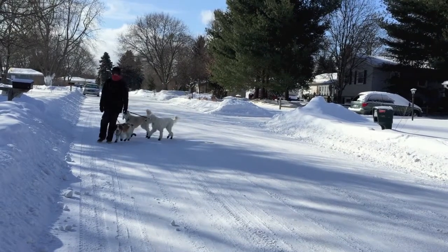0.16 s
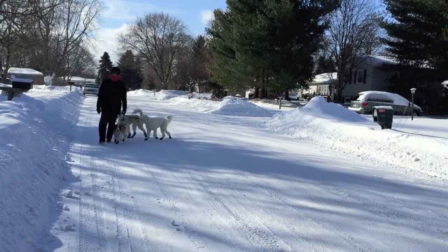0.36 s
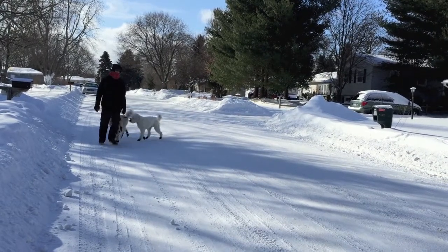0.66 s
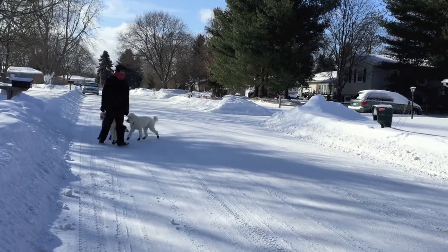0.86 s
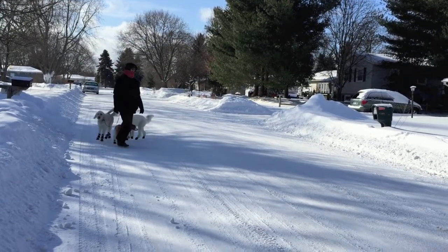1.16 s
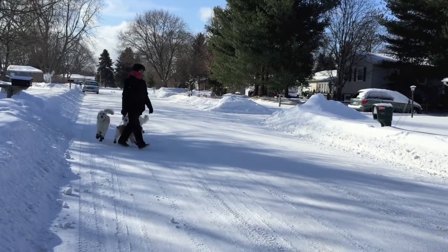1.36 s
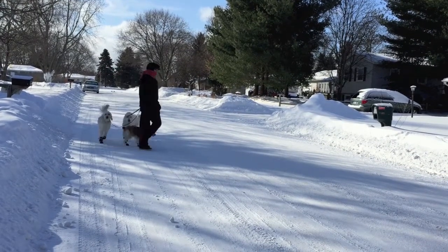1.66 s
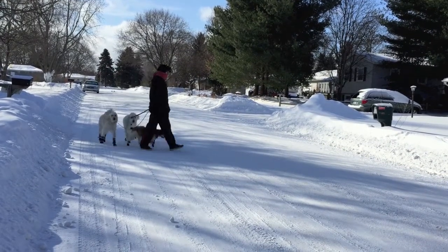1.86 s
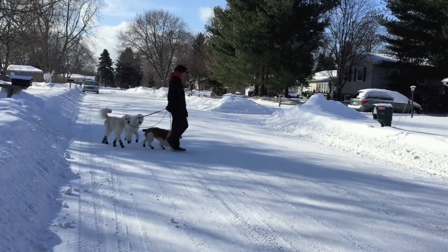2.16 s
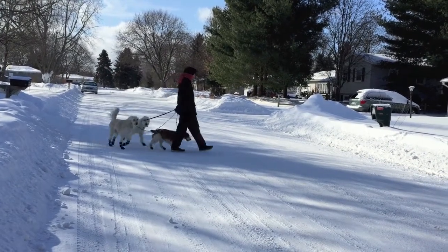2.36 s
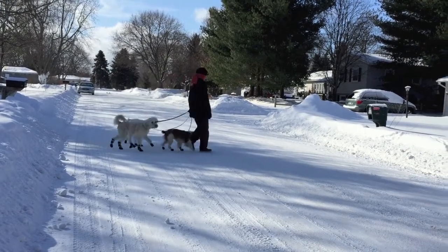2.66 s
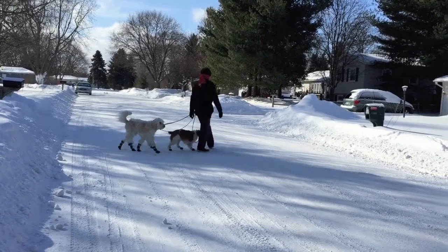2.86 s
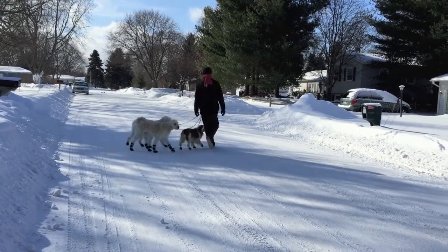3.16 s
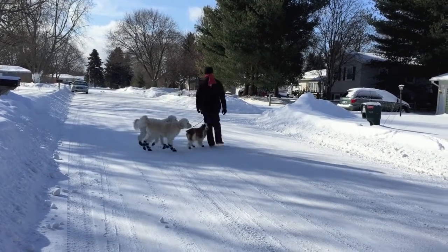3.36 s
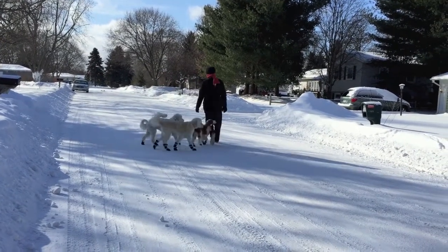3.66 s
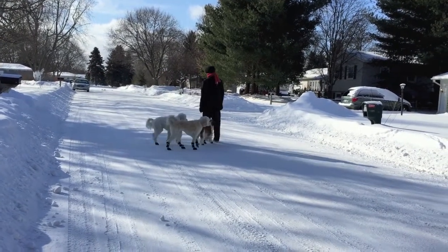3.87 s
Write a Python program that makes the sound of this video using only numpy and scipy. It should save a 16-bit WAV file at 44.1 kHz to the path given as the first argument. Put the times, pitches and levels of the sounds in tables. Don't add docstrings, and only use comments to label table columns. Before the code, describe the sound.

Snow crunches under a walker's boots and dogs' paws, quiet and somewhat distant in the open. Clustered grainy crushes with snaps and dull thuds fall near 0.5, 1.1, 1.6, 2.1, 2.6, 3.1 and 3.7 seconds, paw ticks and scuffs between. Tags clink near 0.1, 0.8, 0.95 and 3.3; faint squeaks come around 0.5, 1.3 and 1.9. A low gust thumps at the start, more from 1.6, strongest again near 3.4.

```python
import sys
import numpy as np
from scipy import signal
from scipy.io import wavfile
from scipy.ndimage import uniform_filter1d

SR = 44100
rng = np.random.default_rng(int(sys.argv[2]) if len(sys.argv) > 2 else 0)


def ratio(d):
    e = np.asarray(d, float) / 20
    return 10 ** e


def master_out(mix):
    frames = np.transpose(np.atleast_2d(mix))
    ceiling = np.clip(frames, -1, 1)
    pcm = np.round(ceiling * 32767).astype(np.int16)
    wavfile.write(sys.argv[1], SR, pcm)


N = 176400


def rms_one(x):
    return x / np.sqrt(np.mean(x ** 2) + 1e-20)


def band(x, low_hz, high_hz):
    edges = [low_hz, min(high_hz, .45 * SR)]
    return signal.sosfilt(signal.butter(2, edges, "band", fs=SR, output="sos"), x)


def drift(rate_hz):
    r = np.exp(-80 * np.pi * rate_hz / SR)
    noise = rng.standard_normal(N // 40 + 2002)
    slow = signal.lfilter([1], [1, -2 * r, r * r], noise)[2000:]
    return np.interp(np.arange(N) / 40, np.arange(len(slow)), rms_one(slow))


def ring(clicks, hz, t60):
    r, w = ratio(-60 / (t60 * SR)), 2 * np.pi * hz / SR
    return signal.lfilter([0, np.sin(w)], [1, -2 * r * np.cos(w), r * r], clicks + 1e-18)


def press(start, length):
    press_share, lift_share = .42, .55
    span = np.arange(int(max(start, 0) * SR), min(int((start + length) * SR), N))
    u = (span / SR - start) / length
    shape = np.clip(np.minimum(u / press_share, (1 - u) / lift_share), 0, 1)
    return span, u, np.sin(np.pi / 2 * shape) ** 2


def hush():
    # (frequency [Hz], density [dB per Hz])
    spectrum = [(88, -31), (150, -7.5), (416, -17.5), (787, -12.5), (1800, -14), (4290, -22), (4910, -24),
                (9270, -26), (15000, -36)]
    level_total_db, patchy_db = -68, .7
    out, together = 0, drift(3)
    edges = 140 * 2 ** np.arange(0, 7.1, .5)
    white, (hz, db) = rng.standard_normal((2, N)), np.transpose(spectrum)
    for k, (low, high) in enumerate(zip(edges, edges[1:])):
        centre = min(np.log(low * high) / 2, np.log(13000))
        level_db = np.interp(centre, np.log(hz), db)
        flicker_db = patchy_db * (2.15 * together + drift(39))
        out = out + ratio(level_db + flicker_db) * band(white[k % 2], low, high)
    return ratio(level_total_db) * rms_one(out)


def wind():
    # (time [s], level [dB])
    breeze_path = [
        (0.0, -65),
        (3.68, -58.5),
        (4.0, -64),
    ]
    # (start [s], length [s], level [dB], top frequency [Hz])
    gust_rows = [(0, 0.09, -33, 183), (.07, 0.051, -41.5, 107), (.46, 0.094, -58, 83),
                 (1.3, 0.11, -60.5, 110), (1.64, 0.16, -44, 112), (1.77, 0.14, -47, 126),
                 (1.962, 0.088, -52.5, 76), (2.12, 0.081, -53, 91), (2.34, 0.14, -51.5, 120),
                 (2.53, 0.18, -49.5, 112), (2.73, 0.079, -58.5, 103), (2.8, 0.045, -48, 89),
                 (2.89, 0.073, -50.5, 77), (3.05, 0.048, -50.5, 125), (3.12, 0.082, -47, 76),
                 (3.24, 0.077, -54, 85.5), (3.39, 0.1, -39, 185), (3.47, 0.052, -44, 117),
                 (3.55, 0.055, -46, 132), (3.62, 0.036, -47.5, 213), (3.72, .11, -51, 82),
                 (3.86, 0.12, -54, 88)]
    gust_low_hz, even_s = 47.7, .024
    white = rng.standard_normal((3, N + SR))
    s, path_db = np.transpose(breeze_path)
    breeze_db = np.interp(np.arange(N) / SR, s, path_db) + 2 * drift(6.0)
    breeze = ratio(breeze_db) * rms_one(band(white[0], 49, 128.4)[SR:])
    gusts = np.zeros(N)
    for k, (start, length, level_db, top_hz) in enumerate(gust_rows):
        span, u, shape = press(start, length)
        top_hz = max(top_hz, 1.3 * gust_low_hz)
        noise = white[1 + k % 2, span[0]:span[-1] + 1 + SR // 2]
        puff = band(band(noise, gust_low_hz, top_hz), 24, 2.18 * top_hz)
        puff = puff / np.sqrt(uniform_filter1d(puff ** 2, size=int(even_s * SR)) + 1e-12)
        gusts[span] += ratio(level_db) * shape * puff[SR // 2:]
    return breeze + band(gusts, 37.5, 485)


def tags():
    # (time [s], peak [dB], pitch struck most [Hz])
    touches = [(0.0882, -48.5, 8560), (0.092, -48, 12600), (0.0954, -55, 8930), (0.1033, -49, 8550),
               (0.108, -43, 8540), (0.1113, -40, 8730), (0.1204, -49, 8400), (0.237, -65, 8500),
               (0.779, -66, 8900), (0.785, -45, 7950), (0.7973, -50, 8900), (0.801, -55, 12250),
               (0.811, -46, 9900), (0.82, -52, 9000), (0.9314, -66, 12000), (0.9532, -49.5, 11900),
               (0.9574, -54, 12000), (3.002, -61, 8960), (3.2703, -45, 6690), (3.2704, -52, 11200),
               (3.2724, -51, 13700), (3.2888, -39.5, 14000), (3.29, -46.5, 9300), (3.296, -54, 9700),
               (3.358, -47.5, 7460)]
    # (frequency [Hz], level [dB])
    modes = [(6700, -7), (7450, -5), (7900, -6), (8350, -1), (8550, -4), (8920, 0), (9450, -3), (11200, -7),
             (11900, -3), (12250, -1), (13000, -9), (13680, 1)]
    t60_s, tick_db, trim_db = .018, -20, -3.5
    fall_db_oct, far_db, scatter_db = 71, 24, 2.5
    s, level_db, struck = np.transpose(touches)
    at, scatter = (s * SR).astype(int), rng.standard_normal((len(s), len(modes)))
    tick = np.zeros(N)
    tick[at] = ratio(level_db + tick_db)
    out = 2 * band(tick, 7500, 11000)
    for k, (hz, mode_db) in enumerate(modes):
        clicks = np.zeros(N)
        off_db = np.minimum(fall_db_oct * np.abs(np.log2(hz / struck)), far_db)
        uneven_db = scatter_db * scatter[:, k] * (off_db > 2)
        clicks[at] = ratio(level_db + trim_db + mode_db - off_db + uneven_db)
        out += ring(clicks, hz, t60_s)
    return band(out, 5000, SR)


def ticks():
    # (time [s], peak [dB])
    claw_hits = [(0.384, -49), (0.417, -48), (0.961, -48), (0.976, -53), (1.026, -57.5), (1.216, -44.5),
                 (1.356, -49), (1.777, -50), (1.825, -49), (1.796, -50), (1.854, -56), (1.877, -47),
                 (2.008, -47), (2.249, -45), (2.279, -52), (2.347, -44), (2.429, -53), (2.842, -51),
                 (2.961, -48), (3.026, -47), (3.067, -43), (3.506, -58), (3.556, -45.5)]
    out, t = np.zeros(N + 512), np.arange(512) / SR
    for s, level_db in claw_hits:
        grit = .4 * rng.standard_normal(len(t)) * np.exp(-t / .001)
        burst = band((t == 0) * 2 + grit, 400, 2600)
        i = int(s * SR)
        out[i:i + len(t)] += ratio(level_db) * burst / np.abs(burst).max()
    return out[:N]


def squeaks():
    # (start [s], length [s], level [dB], pitch [Hz])
    rubs = [
        (0.534, 0.066, -57.5, 1800),
        (1.245, 0.1, -66, 2320),
        (1.348, 0.07, -59, 2170),
        (1.377, 0.034, -71, 4460),
        (1.413, 0.034, -65, 3490),
        (1.916, 0.051, -57.5, 1690),
        (3.46, 0.055, -68, 3300),
    ]
    half_width = .05
    out, rub = np.zeros(N), rng.standard_normal(N) * ratio(2 * drift(61))
    for start, length, level_db, hz in rubs:
        span, u, shape = press(start, length)
        squeak = band(rub[span], hz * (1 - half_width), hz * (1 + half_width))
        out[span] += ratio(level_db) * shape * rms_one(squeak)
    return out


def snap(hz):
    cycles, edge_db, edge_s = 4.5, -17, .002
    t = np.arange(1024) / SR
    edge = band(rng.standard_normal(1024), hz, 2.37 * hz) * np.exp(-t / edge_s)
    onset = np.minimum(t * hz, 1)
    body = np.sin(2 * np.pi * hz * t) * onset * ratio(10 - 60 * t * hz / cycles)
    return body + ratio(edge_db) * edge / np.abs(edge).max()


def snaps():
    # (time [s], peak [dB], pitch [Hz])
    single = [(0.262, -45.5, 810), (0.349, -41, 940), (0.5105, -39, 570), (1.046, -45, 1200),
              (1.069, -40, 840), (1.595, -41, 1040), (1.95, -35, 1630), (2.0895, -36.5, 513),
              (2.317, -41, 930), (2.332, -45, 750), (2.378, -40, 750), (2.475, -32, 824),
              (2.6245, -34.5, 950), (3.126, -44, 557), (3.127, -36, 1900), (3.601, -40.5, 670),
              (3.63, -39, 1810), (3.678, -35, 910), (3.699, -35.5, 644), (3.776, -38.5, 960)]
    # (time [s], peak [dB], pitch [Hz])
    cracks = [(0.514, -43.5, 580), (0.518, -39, 620), (0.54, -43, 1100), (1.078, -33.5, 850),
              (1.0845, -52, 1030), (1.094, -40, 1500), (1.121, -43, 1900), (1.604, -45, 795),
              (1.612, -38, 1340), (1.621, -39.5, 790), (1.66, -46, 980), (2.106, -45, 487),
              (2.11, -47, 517), (2.127, -53, 750), (2.135, -37, 555), (2.152, -40, 850), (2.161, -34, 640),
              (2.167, -43, 596), (2.445, -39, 760), (2.452, -45, 734), (2.636, -47, 820),
              (2.645, -36.5, 520), (2.651, -50, 1000), (2.656, -42, 480), (2.677, -56, 754),
              (2.717, -41, 824), (3.075, -41, 2800), (3.102, -40, 1750), (3.138, -57, 990),
              (3.16, -51, 1300), (3.167, -52, 920), (3.193, -50, 1210), (3.215, -43, 1900),
              (3.657, -45, 740), (3.714, -40, 497), (3.723, -53, 600), (3.734, -37.5, 900),
              (3.76, -48, 2480)]
    # (time [s], peak [dB], pitch [Hz])
    thuds = [(.35, -42.5, 238), (.82, -52.5, 233), (1.0, -47.5, 316), (1.027, -39, 192), (1.09, -41, 173),
             (1.62, -47, 324), (2.152, -40.5, 200), (2.165, -44, 204), (2.34, -45.5, 200),
             (2.476, -45, 203), (2.6, -50, 225), (2.636, -51, 250), (3.7, -40, 210)]
    patter_per_s, patter_db, patter_hz = 70, -61, 760
    out = np.zeros(N + 1024)
    small = []
    for a, b, c in rng.random((4 * patter_per_s, 3)):
        small.append((4 * a, patter_db - 3.5 * np.log(b + .03), patter_hz * 2 ** (3.4 * (c - .5))))
    for s, level_db, hz in list(single) + list(cracks) + list(thuds) + small:
        i = min(int(s * SR), N - 1)
        out[i:i + 1024] += ratio(level_db) * snap(hz)
    return band(out[:N], 180, 6100)


def grains(per_s, spread_db, pitches):
    cycles, patch_db = 10.0, 3
    sizes = ratio(spread_db * np.minimum(rng.exponential(1, N), 3.5)) * rng.choice([-1, 1], N)
    born, dealt = rng.random(N) < per_s / SR, rng.integers(0, len(pitches), N)
    rows = []
    for k, hz in enumerate(pitches):
        rung = ring(sizes * born * (dealt == k), hz, cycles / hz)
        rows.append(rms_one(band(rung, hz / 2, 1.93 * hz) * ratio(patch_db * drift(27.0))))
    return np.array(rows)


def crushed(rows, rings, pitches, below_db, above_db, roll):
    out = np.zeros(N)
    for start, length, level_db, hz in rows:
        span, u, shape = press(start, length)
        off = np.log2(pitches[:, None] / hz) - roll * (u - .5)
        weight = ratio(np.where(off > 0, -above_db * off, below_db * off))
        weight = weight / np.sqrt(np.sum(weight ** 2, axis=0))
        out[span] += ratio(level_db) * shape * np.sum(weight * rings[:, span], axis=0)
    return out


def footfalls():
    # (start [s], length [s], level [dB], grain pitch [Hz])
    falls = [(.004, 0.042, -56, 850), (.29, 0.13, -57.5, 328), (.47, 0.13, -54.5, 520),
             (.47, 0.064, -61.5, 1560), (.54, 0.075, -63, 1450), (1.04, 0.03, -53, 1240),
             (1.058, 0.059, -49.5, 1570), (1.53, 0.071, -60, 2480), (1.58, 0.082, -49.5, 1220),
             (1.63, 0.068, -56.5, 1520), (2.07, 0.13, -47.5, 630), (2.07, 0.18, -61, 1800),
             (2.27, 0.15, -57.5, 820), (2.43, 0.053, -55.5, 684), (2.47, 0.05, -59, 736),
             (2.625, 0.083, -48.5, 664), (2.66, 0.11, -55.5, 960), (2.6, .1, -57, 2020),
             (2.82, 0.21, -70.5, 2050), (3.06, 0.22, -59, 2020), (3.12, 0.072, -55, 790),
             (3.62, 0.074, -53.5, 2100), (3.65, 0.11, -55, 1450), (3.69, 0.059, -48, 520),
             (3.7, 0.083, -51, 1280), (3.75, 0.063, -47.5, 1490), (3.83, 0.16, -65, 1140),
             (1.1, 0.11, -62, 2170), (1.86, 0.14, -62, 1780), (2.54, 0.09, -59.5, 2500),
             (3.28, 0.14, -65.5, 1780), (.8, 0.43, -64, 690)]
    # (start [s], length [s], level [dB], grain pitch [Hz])
    drags = [(0, 0.1, -65.5, 6050), (.4, 0.41, -67, 8600), (1.26, 0.45, -70.5, 3000),
             (1.33, 0.14, -66.5, 9300), (1.08, 0.44, -70, 9500), (2.07, .14, -66, 4540),
             (1.52, 0.2, -65.5, 3480), (2.55, 0.24, -60, 3570), (3.1, 0.17, -61.5, 3700),
             (3.31, 0.23, -65, 11800), (3.68, 0.15, -62, 4850)]
    crust_top_hz = 2800
    low, high = np.geomspace(200, 5000, 16), np.geomspace(600, 15000, 14)
    crunch = crushed(falls, grains(5000, 2.6, low), low, below_db=10, above_db=9, roll=.2)
    scuff = crushed(drags, grains(40000, 2.5, high), high, below_db=1, above_db=9, roll=0)
    clumped = crunch * ratio(1.5 * drift(34))
    return band(band(clumped, 72, crust_top_hz), 81, 1.63 * crust_top_hz) + scuff


def scene():
    background = hush() + wind()
    dogs = tags() + ticks()
    snow = squeaks() + snaps() + footfalls()
    return (background + dogs + snow)[None, :]


def low_pass(x):
    return signal.sosfilt(signal.butter(12, 15400, fs=SR, output="sos"), x)


def record(dry):
    # (centre [Hz], width [Hz], depth [0-1])
    port_dips = [(4890, 1180, 0.2), (10470, 1300, 0.33)]
    for hz, width_hz, depth in port_dips:
        dry = dry - depth * band(dry, hz - width_hz / 2, hz + width_hz / 2)
    mix = signal.sosfilt(signal.ellip(10, .5, 60, 15380, fs=SR, output="sos"), dry)
    return low_pass(mix)


dry = scene()
out = record(dry)
master_out(out)
```